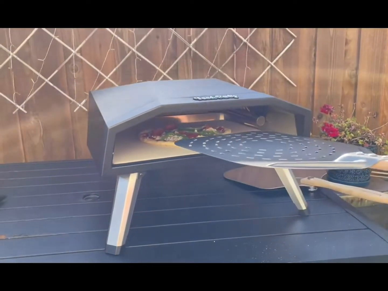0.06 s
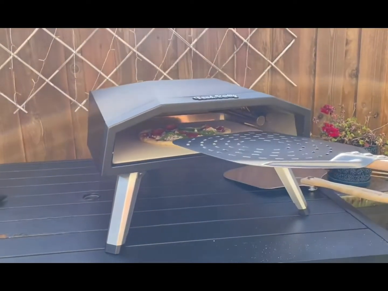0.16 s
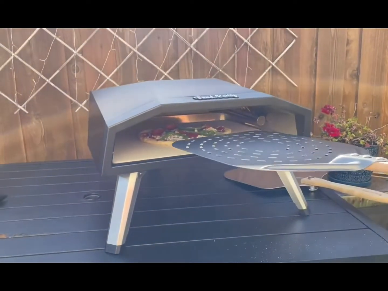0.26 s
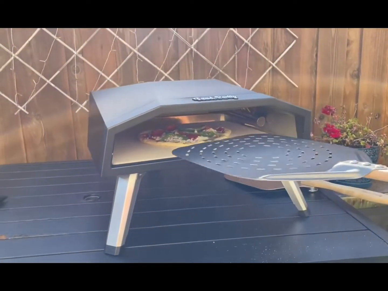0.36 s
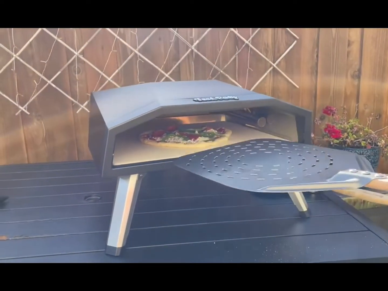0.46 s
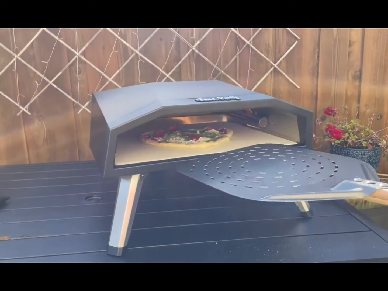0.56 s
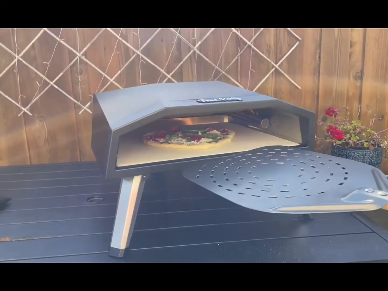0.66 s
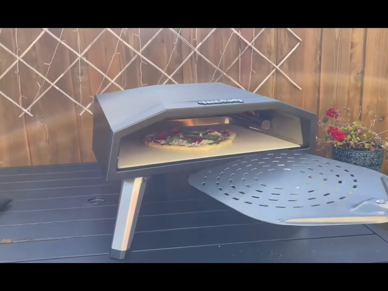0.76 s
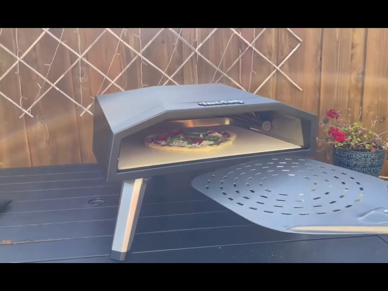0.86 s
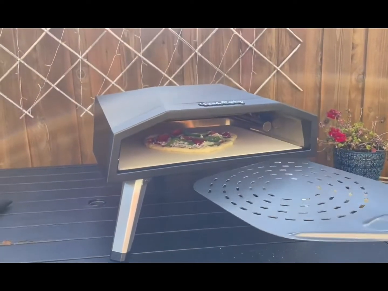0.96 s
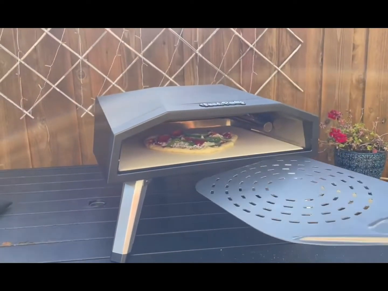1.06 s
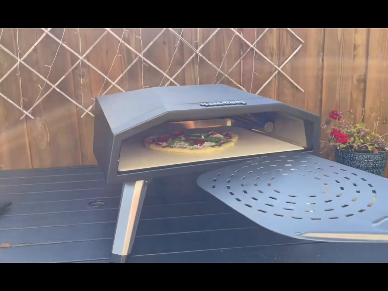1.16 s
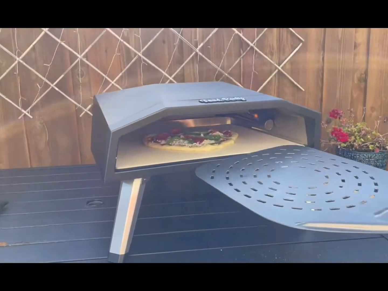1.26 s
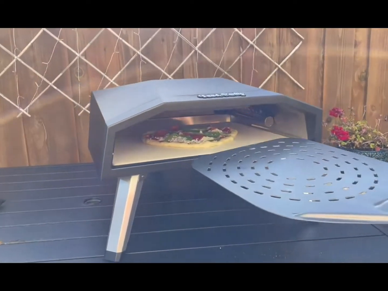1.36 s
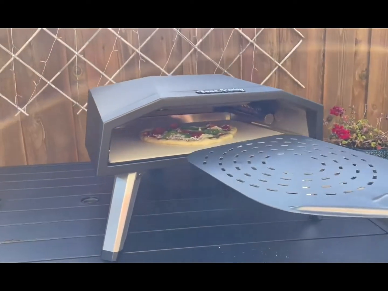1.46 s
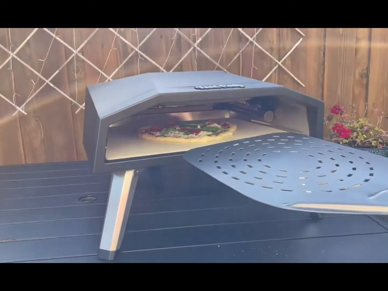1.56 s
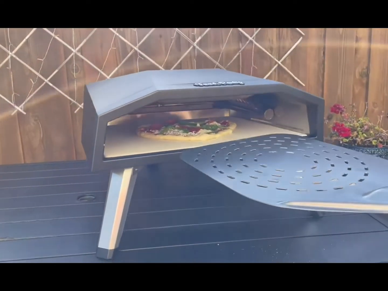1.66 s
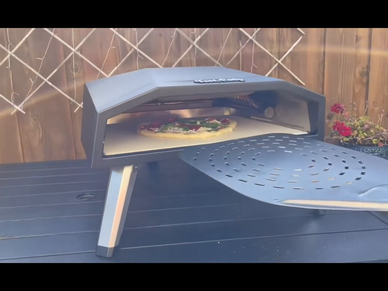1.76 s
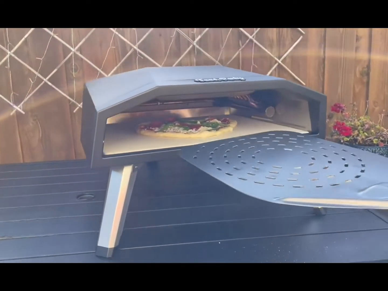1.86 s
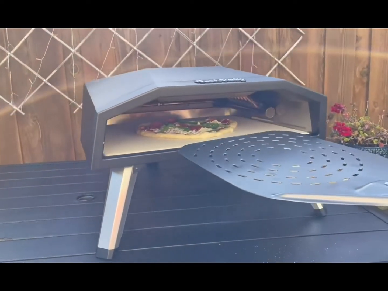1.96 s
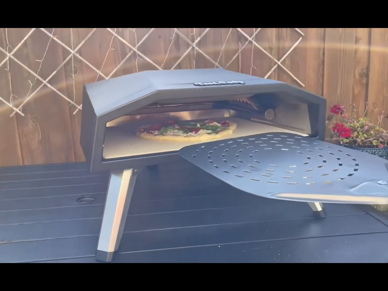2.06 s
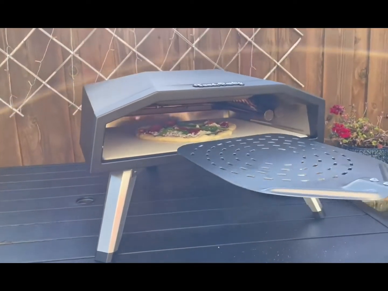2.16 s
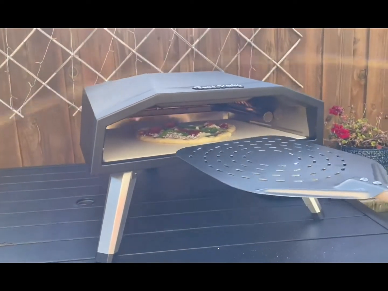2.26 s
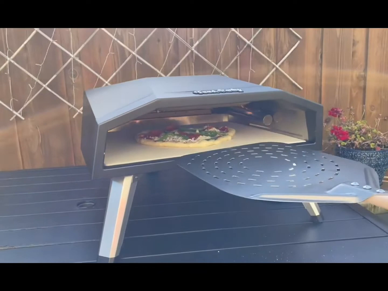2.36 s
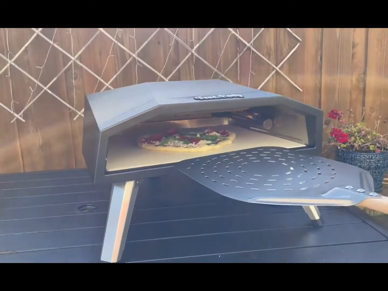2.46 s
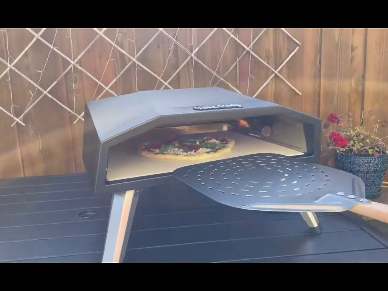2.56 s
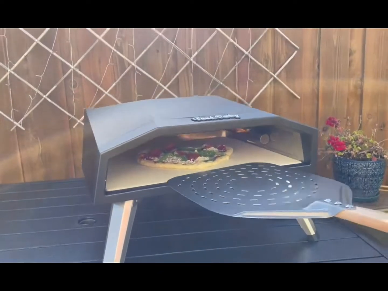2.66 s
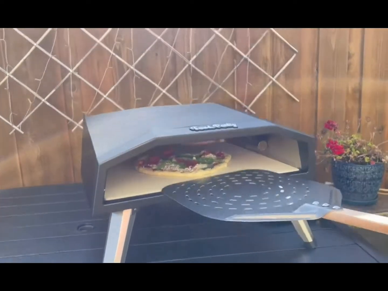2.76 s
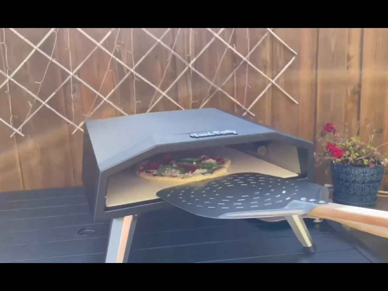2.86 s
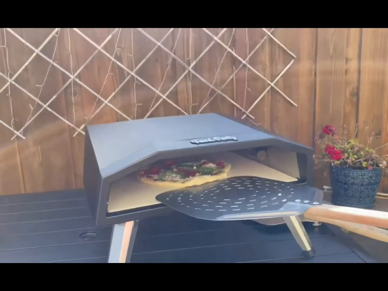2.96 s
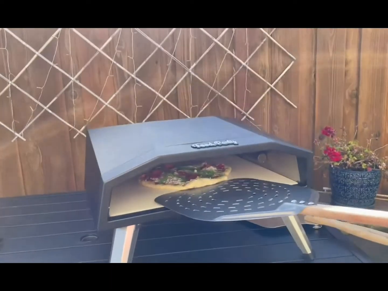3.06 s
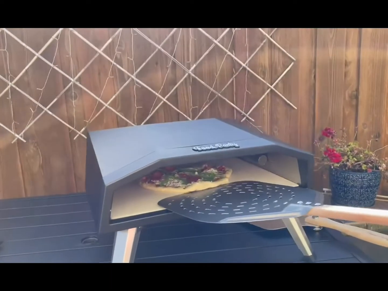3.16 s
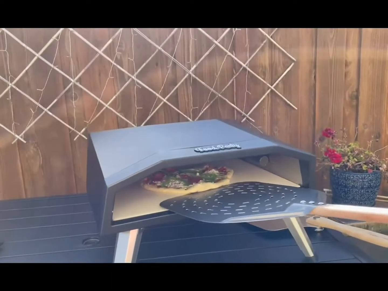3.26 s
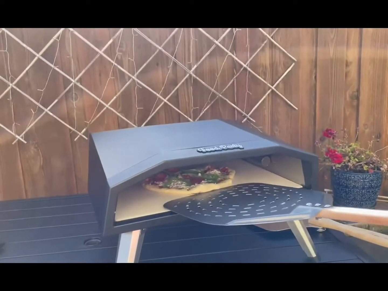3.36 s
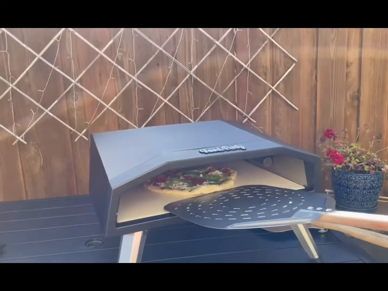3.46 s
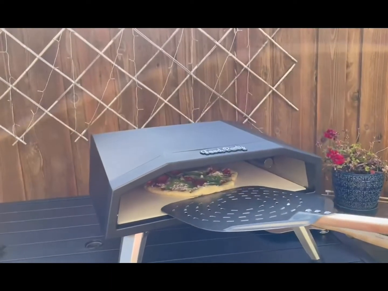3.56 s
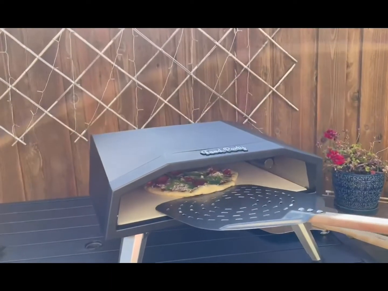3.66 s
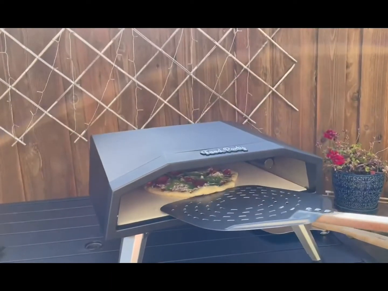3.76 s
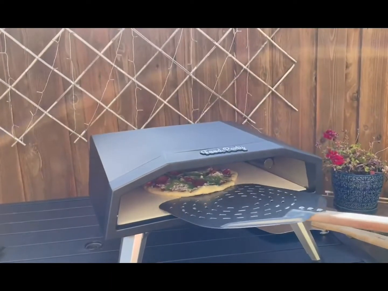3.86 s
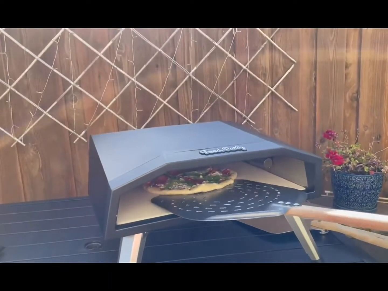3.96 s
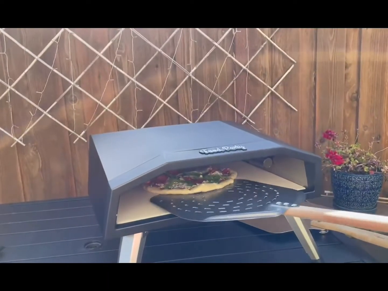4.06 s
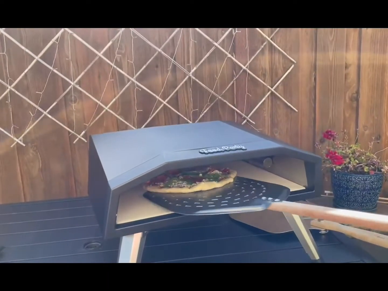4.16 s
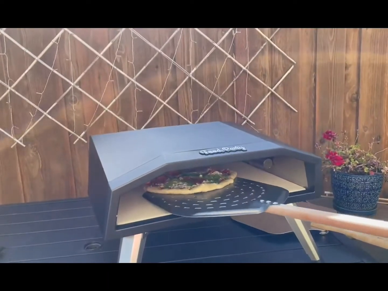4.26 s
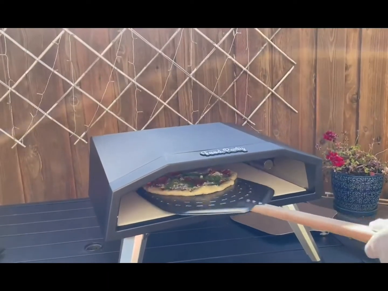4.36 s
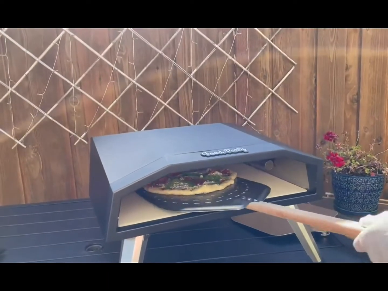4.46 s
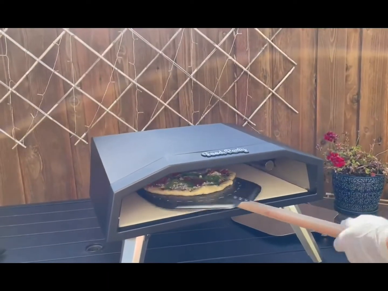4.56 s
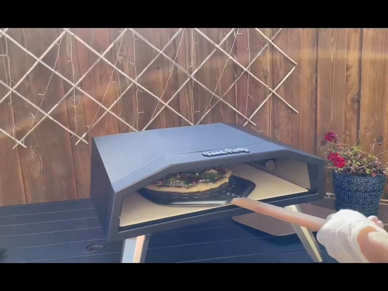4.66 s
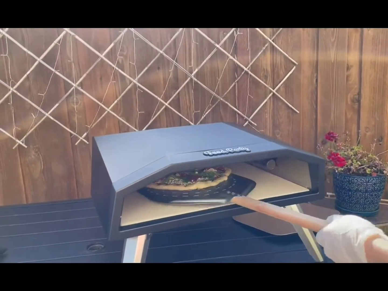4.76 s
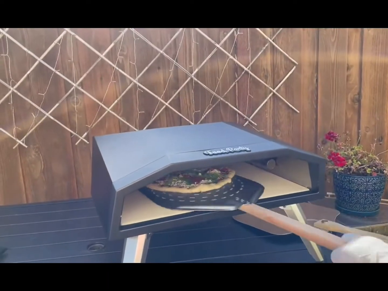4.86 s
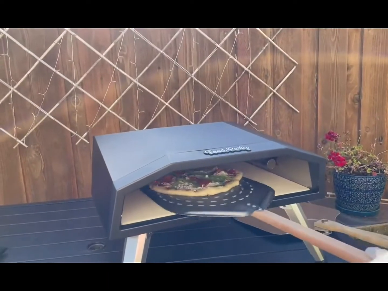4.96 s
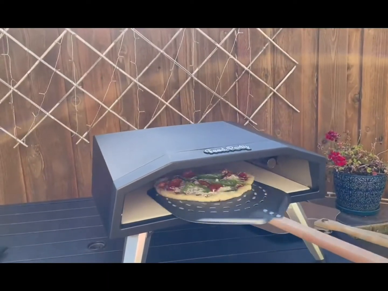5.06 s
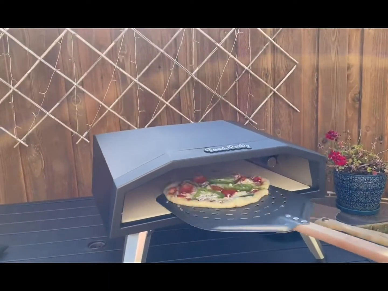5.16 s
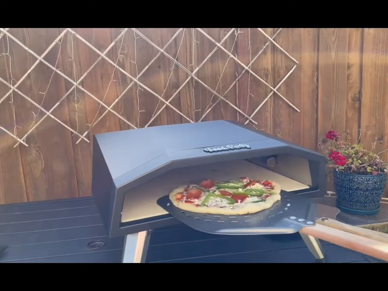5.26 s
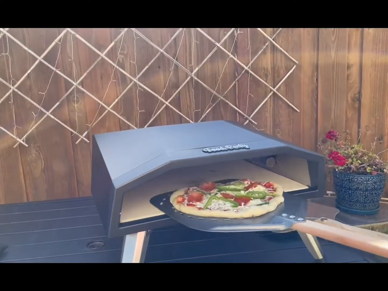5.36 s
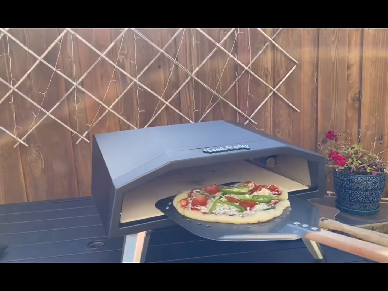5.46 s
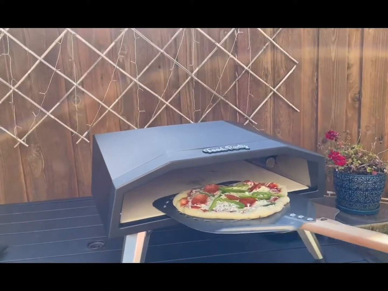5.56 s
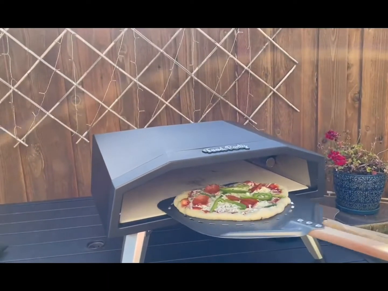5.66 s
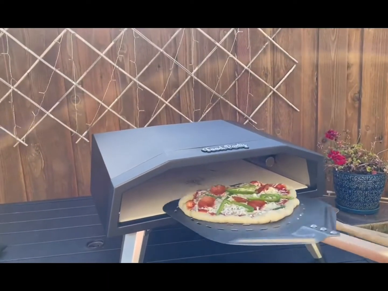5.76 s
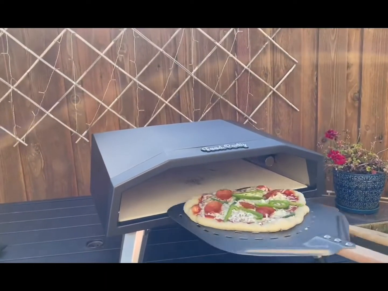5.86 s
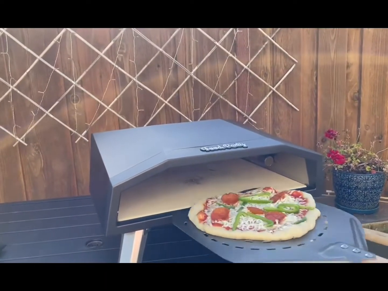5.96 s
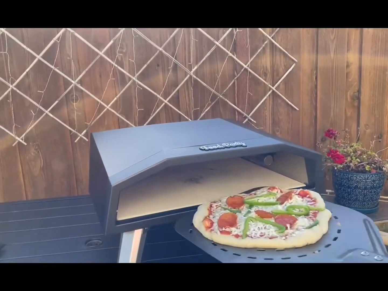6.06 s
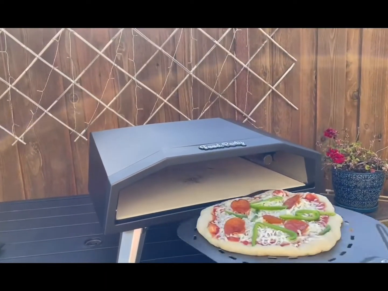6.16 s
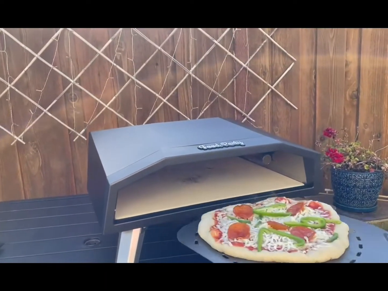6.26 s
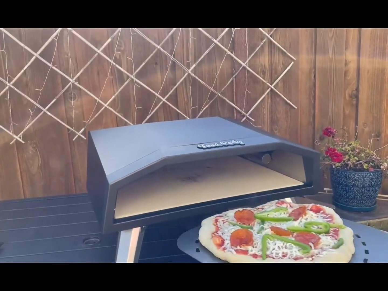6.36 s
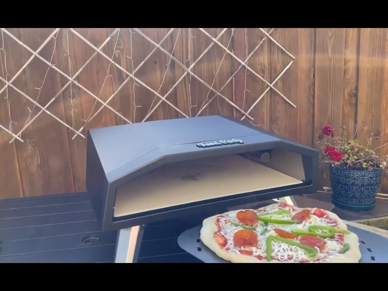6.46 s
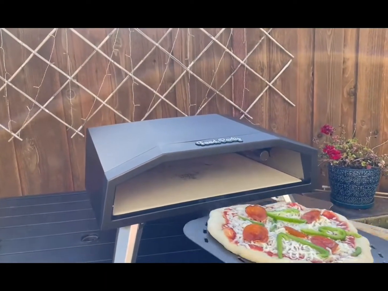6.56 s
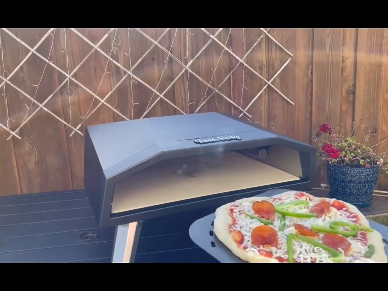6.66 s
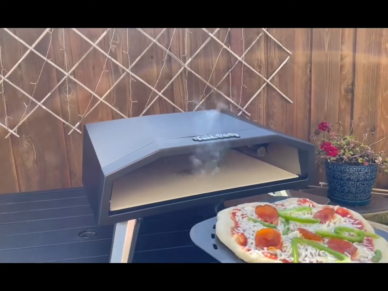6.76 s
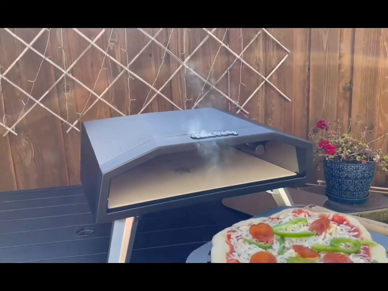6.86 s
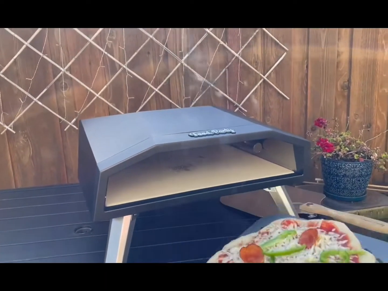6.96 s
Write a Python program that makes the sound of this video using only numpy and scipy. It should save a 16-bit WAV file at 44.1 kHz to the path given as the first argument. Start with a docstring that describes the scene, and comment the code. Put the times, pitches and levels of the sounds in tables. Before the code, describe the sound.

Close outdoor microphone on a patio. Small dry ticks dot quiet air for two seconds, then a gust rumbles and pops against the microphone. A thin metal peel claps onto the oven stone and scrapes gritty and bright in short strokes, strongest before the middle four-second mark. Lower droning, hard cracks and a brief squeak follow as it works under the pizza. It leaves; faint ticks, a rustle and distant whine remain.

```python
"""Small dry ticks come first, in quiet outdoor air; then a gust buffets the microphone with rumble and pops.
A perforated metal peel claps down on the stone of a patio pizza oven and is shoved under the pizza in strokes.
Random slips of grit shake the modes of its blade: it hisses, rasps, drones and cracks where it catches.
The peel is drawn out and carried off with a faint rustle, while a thin far whine and a low hum fade in.
Contacts are noise bursts ringing a plate, wind is filtered noise with slowing pops, the whine is a sine."""
import sys
import numpy as np
from scipy import signal
from scipy.fft import rfft, irfft, next_fast_len
from scipy.io import wavfile
from scipy.ndimage import uniform_filter1d, map_coordinates

SR = 44100
rng = np.random.default_rng(int(sys.argv[2]) if len(sys.argv) > 2 else 0)


def generate_wav(signal):
    """Clip the signal to [-1, 1] and save it as 16-bit WAV at the path in sys.argv[1]."""
    frames = np.transpose(np.atleast_2d(signal))
    scaled = np.clip(frames, -1, 1) * 32767
    pcm = np.round(scaled).astype(np.int16)
    wavfile.write(sys.argv[1], SR, pcm)


N = 310023
TIME = np.arange(N) / SR

# colour of the hiss before the pizza covers the blade: [f/Hz, level/dB]
BARE_HISS = [(2000, -40), (6000, -20), (7400, -6.5), (8500, -3), (10000, -.5), (11500, -1.5), (13200, -1.5),
             (14200, -5), (15000, -12), (15800, -19)]
# colour of the hiss under the pizza: [f/Hz, level/dB]
COVERED_HISS = [(2000, -40), (6000, -22), (7400, -10), (8500, -7), (10000, -3.5), (11500, -1), (13100, 0),
                (14200, -4), (15000, -11), (15800, -18)]
# colour of the metallic edge rasp: [f/Hz, level/dB]
RASP = [(1500, -43), (2600, -16), (3300, -0.5), (4400, -0.5), (5300, 0), (6600, 1.5), (8000, -10),
        (10000, -36), (15000, -9)]
# colour of the hollow blade body: [f/Hz, level/dB]
BODY = [(200, -34), (450, 2.5), (700, 2), (1200, 0), (1900, -1.5), (2600, 0.5), (3300, -8.5), (6000, -64)]
COVER_S, COVERING_S = 3.4, .7   # the pizza covers the blade: from when, over how long
JUDDER_DB, JUDDERS_PER_S = .9, 200   # stick and slip roughen the scrape
# the bare blade keeps one mode singing; its level is against the rasp
SING_HZ, SING_WIDTH_HZ, SING_DB = 3330, 12, -8
SING_FADE_S, SING_FADING_S = 2.8, .6   # that mode is damped as the blade goes in: from when, how long
JOLT_RASP_DB, JOLT_BODY_DB = -14, -17   # how strongly a catch also shakes the rasp and the body
JOLT_SPREAD_S = 0.018   # the edge digs in and lets go over this time


def scrape():
    """Grit under the sliding edge hisses and shakes the blade, which rasps, sings, booms and drones."""
    hiss_gain, rasp_gain, body_gain = friction()
    judder = from_db(JUDDER_DB * drift(JUDDERS_PER_S))

    grains = sliding_plate(hiss_gain * judder, t60=0.12, ring_db=-4.5)
    covered = ramp(COVER_S, COVERING_S)
    hiss = colour(grains * (1 - covered), BARE_HISS) + colour(grains * covered, COVERED_HISS)

    edge = flexed(sliding_plate(1, t60=0.16, ring_db=5))
    blade = evened(pressed_blade(edge, ring_db=-10.5), span_s=0.0084) * judder + snags()
    singing = evened(resonance(white(), SING_HZ, SING_WIDTH_HZ), span_s=.05)
    singing = from_db(SING_DB) * singing * (1 - ramp(SING_FADE_S, SING_FADING_S))

    jolt = uniform_filter1d(bursts(CATCHES), int(JOLT_SPREAD_S * SR))
    rasp_drive = np.hypot(rasp_gain, from_db(JOLT_RASP_DB) * jolt)
    body_drive = np.hypot(body_gain, from_db(JOLT_BODY_DB) * jolt)
    rasp = colour(blade * rasp_drive, RASP) + singing * rasp_gain
    body = colour(blade * body_drive, BODY)
    mixed = from_db(2.0) * hiss + from_db(-1.35) * rasp + from_db(-0.24) * body
    return oven(mixed) + drone(body_gain)


# pushes and pulls of the blade on the stone: [start t/s, speeding up t/s, slowing down t/s,
# hiss level/dB, rasp against hiss level/dB, body against hiss level/dB]
STROKES = [(2.608, 0.01, 0.31, -41, -4, -5.5), (2.697, 0.15, 0.1, -33.5, -10, -34),
           (2.781, 0.073, 0.058, -31, -7.5, -21), (2.873, 0.044, 0.065, -36, -4, -16),
           (2.997, 0.06, 0.055, -35, -8, -16.5), (3.093, 0.085, 0.053, -39.5, -5.5, -15.5),
           (3.285, 0.08, 0.25, -40, -10, -23), (3.418, 0.018, 0.052, -32, -9, -24),
           (3.507, 0.14, 0.27, -31, -8.5, -20), (3.713, 0.077, 0.071, -30.5, -9.5, -18.5),
           (3.824, 0.11, 0.092, -25, -7, -16), (4.077, 0.07, 0.11, -27, -9, -14),
           (4.215, 0.055, 0.046, -45.5, -5, -19), (4.3, 0.048, 0.12, -31, -6.5, -8),
           (4.512, 0.015, 0.14, -40.5, -3.5, -9), (4.563, 0.056, 0.07, -40, -1.5, -17),
           (4.741, 0.15, 0.029, -41, -1.5, -24), (5.05, 0.06, .04, -57, 6.5, -12),
           (5.125, 0.0061, 0.041, -34, -8, -28), (5.158, .01, 0.058, -39.5, -5, -25),
           (5.217, 0.0059, 0.054, -35.5, -7, -13.5), (5.245, 0.062, 0.09, -35.5, -8, -17.5),
           (5.371, 0.061, 0.081, -37.5, -6, -13.5), (5.464, 0.035, 0.2, -49, -1.5, -11),
           (5.645, 0.0046, 0.079, -41, -3.5, -9), (5.669, 0.058, 0.11, -35, -5.5, -17),
           (5.837, 0.061, 0.063, -38, -3, -10), (5.944, 0.037, 0.017, -44.5, -8.5, -15.5)]
HISS_POWER, RASP_POWER, BODY_POWER = 2.05, 1.43, 1.9   # each grows as this power of the sliding speed
ON_STONE_S = (2.616, 6.0)   # the blade lies on the stone from, until
DRAG_HISS_DB, DRAG_RASP_DB, DRAG_BODY_DB = -58.5, -57, -59.5   # it keeps creeping between strokes


def friction():
    """Strength of hiss, rasp and body: each follows the speed of the strokes, over a slow creep."""
    touching = (TIME > ON_STONE_S[0]) & (TIME < ON_STONE_S[1])
    creep = from_db([[DRAG_HISS_DB], [DRAG_RASP_DB], [DRAG_BODY_DB]])
    power = (creep * touching) ** 2
    growth = np.array([[HISS_POWER], [RASP_POWER], [BODY_POWER]])
    for start_s, rise_s, fall_s, db, rasp_db, body_db in STROKES:
        speed = swell(start_s, rise_s, fall_s)
        moving = speed > 0
        strongest = from_db([[db], [db + rasp_db], [db + body_db]])
        power[:, moving] += (strongest * speed[moving] ** growth) ** 2
    return np.sqrt(power)


def swell(start_s, rise_s, fall_s):
    """Speed of one move of the hand: from rest up to 1 and back to rest."""
    rising = ramp(start_s, rise_s)
    falling = 1 - ramp(start_s + rise_s, fall_s)
    return np.sin(np.pi / 2 * np.minimum(rising, falling))


MODE_SPREAD_DB = 6   # a place on the edge wakes some modes far more than others


def sliding_plate(force, t60, ring_db, count=4):
    """The touching point wanders along the edge, and each place wakes other modes of the sheet."""
    shares = np.array([from_db(18 * drift(8)) for _ in range(count)])
    shares /= np.linalg.norm(shares, axis=0)
    out = np.zeros((2, N))
    for share in shares:
        rubbing = grit(per_s=9000, size_db=1.5, judder_db=2.0) * force * share
        out += thin_plate(rubbing, t60, ring_db, MODE_SPREAD_DB)
    return out


def grit(per_s, size_db, judder_db):
    """Grains of stone slip under the edge at random, rougher and softer as the blade judders."""
    sizes = from_db(size_db * np.minimum(rng.exponential(1, N), 4))
    slips = white() * sizes * (rng.random(N) < per_s / SR)
    return rms_one(slips * from_db(judder_db * drift(180)))


def thin_plate(force, t60, ring_db, spread_db=0, count=480):
    """A thin sheet's crowd of weak higher modes, about evenly spaced in Hz; spread_db makes them uneven."""
    t = np.arange(SR // 4) / SR
    lines = np.zeros(len(t) // 2 + 1, complex)
    places_hz = np.linspace(800, 16000, count) + rng.uniform(-40, 40, count)
    strengths = from_db(spread_db * np.minimum(rng.standard_normal(count), 2))
    bins = (places_hz * len(t) / SR).astype(int)
    lines[bins] = strengths * np.exp(2j * np.pi * rng.random(count))
    modes = irfft(lines, len(t)) * np.exp(-np.log(1000) * t / t60)
    response = from_db(ring_db) * modes / np.linalg.norm(modes)
    response[0] += 1   # the force itself is heard directly
    return signal.oaconvolve(force, response[None] / np.linalg.norm(response), axes=1)[:, :N]


# modes of the blade pressed on the stone: [f/Hz, width f/Hz, level/dB]
PRESSED = [(1110, 74, -1.5), (1215, 82, 3), (1580, 61, 6), (2215, 77, 4.5), (2670, 110, -2.5),
           (2780, 80, 9), (3285, 120, 9.5), (3870, 120, 5.5), (4460, 210, 11), (4940, 130, 6.5),
           (5140, 79, -11), (6520, 160, 0), (7140, 200, 1)]
BEND_SHARE, BENDS_PER_S = .022, 8   # the modes shift as the blade flexes
ROAM_DB, ROAMS_PER_S = 9, 9   # how much and how often the drive of a mode changes


def pressed_blade(force, ring_db):
    """Force is heard directly and through damped bending modes, which shift as the contact point moves."""
    ringing = 0
    for hz, width, db in PRESSED:
        moving_hz = hz * (1 + BEND_SHARE * drift(BENDS_PER_S))
        drive = from_db(db + ROAM_DB * np.tanh(drift(ROAMS_PER_S)))
        ringing = ringing + resonance(force, moving_hz, width) * drive
    return force + from_db(ring_db) * ringing


FLEX_SHARE, FLEXES_PER_S = .012, 6   # the fine modes shift together as the blade flexes


def flexed(x):
    """Bending the sheet raises and lowers all its modes a little: the sound is read at a varying speed."""
    place = np.cumsum(1 + FLEX_SHARE * drift(FLEXES_PER_S))
    return np.array([map_coordinates(ch, [place], order=3, mode="mirror") for ch in x])


SNAGS_PER_S, SNAG_DB = 90, -9.5   # coarse grains snag the edge at random; level against the smooth rasp


def snags():
    """Coarse grains catch the edge, each a tiny crack with a short shudder."""
    cracks = rng.choice([-1, 1], (2, N)) * rng.uniform(0.14, 1, N) * (rng.random(N) < SNAGS_PER_S / SR)
    return from_db(SNAG_DB) * rms_one(thin_plate(cracks, t60=.025, ring_db=7))


# the blade's lowest modes:
# [f/Hz, width f/Hz, level/dB at the hardest push, power by which it grows with the push]
LOW_MODES = [(179.5, 47, -59.5, 0.32), (235, 12, -44, 0.71), (248, 7.2, -52.5, 2.3), (349, 13, -54.5, 0.7),
             (488, 16, -51, 1.15), (639, 22, -43.5, 1.27), (670, 82, -60, 0.74)]
LOADED_S, LOADING_S = 4.15, .15   # the pizza's weight comes onto the blade: from when, over how long
DRONE_LAG_S, DRONE_BEND_SHARE = .032, .02   # the drone trails the push, and its pitch wanders


def drone(push):
    """Once it carries the pizza, the blade's low modes follow the push with a lag, each at its own power."""
    keep = np.exp(-1 / (DRONE_LAG_S * SR))
    stored = signal.lfilter([1 - keep], [1, -keep], push + 1e-18)
    effort = stored / stored.max()
    shaking = white()
    bend = 1 + DRONE_BEND_SHARE * drift(4)
    modes = 0
    for hz, width, db, power in LOW_MODES:
        mode = evened(resonance(shaking, hz * bend, width), span_s=0.076)
        modes = modes + from_db(db) * effort ** power * mode
    return ramp(LOADED_S, LOADING_S) * modes


# the echo off the oven's roof, as the blade moves: [t/s, delay t/s]
ROOF_PATH = [(2.6, .00183), (3.05, .00188), (3.55, .00197), (3.85, .00187), (3.95, .002), (4.1, .0017),
             (4.3, .00185)]
# weak echoes off the oven's walls: [delay t/s]
WALL_DELAYS = [.00068, .00082, .00098, .00118, .0023, .003, .0037]
HOOD_SHARE, HOOD_FLICKER_DB = .22, 4   # the roof echo comes and goes as the blade tilts
SHADE_S, SHADING_S = 4.18, .14   # the pizza shades the roof echo: from when, over how long
WALL_SHARE, WALL_CHANGES_PER_S = .14, 7   # wall echoes swing in strength and sign as the blade moves


def oven(x):
    """The roof echo varies in delay until the pizza shades it; wall echoes vary in strength and sign."""
    flicker = from_db(HOOD_FLICKER_DB * np.tanh(drift(7.98)))
    share = HOOD_SHARE * flicker * (1 - ramp(SHADE_S, SHADING_S))
    sent = (TIME - np.interp(TIME, *np.transpose(ROOF_PATH))) * SR
    out = x + share * np.array([map_coordinates(ch, [sent], order=3) for ch in x])
    power = 1 + share ** 2
    for delay_s in WALL_DELAYS:
        share = WALL_SHARE * drift(WALL_CHANGES_PER_S)
        out = out + share * np.roll(x, round(delay_s * SR), axis=1)
        power = power + share ** 2
    return out / np.sqrt(power)   # echoes change the colour more than the level


# the blade lands on the stone: [t/s, level/dB, contact t60/s (time to fade by 60 dB)]
LANDINGS = [(2.4218, -17, 0.064), (2.4477, -14.5, 0.047), (2.453, -34, 0.019), (2.615, -21, 0.24)]
# modes of the blade ringing freely: [f/Hz, level/dB, t60/s]
FREE = [(620, 0, .35), (764, 1, .4), (1071, -5, 1.0), (1400, -10, 1.0), (1567, -13, .48), (1723, -2, .45),
        (2207, -8, .56), (2390, -2, .45), (2550, -3, .4), (3058, -2, .25), (3321, -5, 1.3), (3494, -6, .25),
        (3978, -4, .2), (5109, -11, .3), (6492, -6, .2)]
# colour of the weak modes ringing on: [f/Hz, level/dB]
BLOOM = [(300, 2), (700, -3), (1500, 3), (2500, 3), (3500, 2.5), (5500, -3.5), (9000, -2), (16000, -28)]
# colour of the clap: [f/Hz, level/dB]
KNOCK = [(150, -5), (600, -2), (1500, -29), (3400, 2.5), (6000, -6.5), (9000, 5.5), (13000, -3.5),
         (16000, -15)]


def landings():
    """The blade claps on the stone; a few clear modes and a crowd of weak ones ring on."""
    force = white() * bursts(LANDINGS)
    ring = np.zeros((2, N))
    t = np.arange(SR) / SR
    for s, landing_db, _ in LANDINGS:
        at = round(s * SR)
        for hz, db, t60 in FREE:
            phase = 2 * np.pi * (hz * t + rng.random((2, 1)))
            fade = np.exp(-np.log(1000) * t / t60)
            ring[:, at:at + SR] += from_db(landing_db + db) * fade * np.sin(phase)
    bloom = colour(thin_plate(force, t60=0.21, ring_db=30, spread_db=3), BLOOM)
    clap = colour(thin_plate(force, t60=0.018, ring_db=-4.0), KNOCK)
    return from_db(-6.5) * clap + from_db(-13.5) * bloom + from_db(-34) * ring


# the edge catches on the stone: [t/s, level/dB, contact t60/s]
CATCHES = [(3.4345, -35, 0.035), (3.454, -30.5, 0.47), (4.097, -30, 0.023), (4.319, -24, 0.029),
           (4.491, -29, 0.023), (4.517, -27.5, 0.048), (4.881, -21.5, 0.047), (5.016, -34.5, 0.065),
           (5.137, -47, 0.037), (5.2268, -22.5, 0.028), (5.4641, -13, 0.035), (5.65, -28, 0.033),
           (5.7507, -10.5, 0.019), (5.8436, -26, 0.069), (5.8747, -14, 0.025)]
# colour of a catch: [f/Hz, level/dB]
CATCH = [(60, -9), (280, 9.5), (1500, -16.5), (3800, 6.5), (5600, 7.5), (8000, 15), (10500, 10.5),
         (13000, 18.5), (16000, -46)]
CRACK_T60_S = .011   # fade of the force behind the first crack


def catches():
    """The edge snags: a sharp crack, with a shudder of the blade."""
    crack_fades = bursts([(s, db, CRACK_T60_S) for s, db, _ in CATCHES])
    crack = evened(white(), span_s=0.0016) * crack_fades
    crack = thin_plate(crack, t60=.035, ring_db=-4)
    shudder = thin_plate(white() * bursts(CATCHES), t60=0.027, ring_db=-14.0)
    return colour(from_db(-2) * crack + from_db(-20.5) * shudder, CATCH)


# modes that glide together as the edge slides right under the pizza:
# [starting f/Hz, final f/Hz, width f/Hz, level/dB]
CHAFE_MODES = [(4300, 4000, 120, -48.5), (3260, 3840, 410, -42.5)]
CHAFE_START_S, CHAFE_RISE_S, CHAFE_FALL_S = 4.76, .145, .03
SQUEAK_START_S, SQUEAK_RISE_S, SQUEAK_FALL_S = 4.89, .022, .012
SQUEAK_HZ, SQUEAK_RISE_HZ_PER_S, SQUEAK_DB = 4150, 2700, -42   # pitch at its start, slight rise, level


def chafe():
    """Uneven slips drive two gliding modes hoarsely; a short, rising, jittery squeak comes near the end."""
    slips = white() * from_db(5.3 * drift(140))
    depth = ramp(CHAFE_START_S, CHAFE_RISE_S)
    hoarse = 0
    for first, last, width, db in CHAFE_MODES:
        gliding_hz = first + (last - first) * depth
        hoarse = hoarse + from_db(db) * rms_one(resonance(slips, gliding_hz, width))
    hz = SQUEAK_HZ + SQUEAK_RISE_HZ_PER_S * (TIME - SQUEAK_START_S) + 35 * drift(280)
    tone = np.sin(2 * np.pi * np.cumsum(hz) / SR)
    squeak = from_db(SQUEAK_DB + 2.9 * drift(200)) * tone * [[1], [0]]
    hoarse = swell(CHAFE_START_S, CHAFE_RISE_S, CHAFE_FALL_S) ** 2 * hoarse
    return hoarse + swell(SQUEAK_START_S, SQUEAK_RISE_S, SQUEAK_FALL_S) * squeak


# low modes of the bump: [f/Hz, level/dB, t60/s]
BUMP_MODES = [(58, -31.5, 0.19), (176, -36.5, 0.3)]
BUMP_S, BUMP_RISE_S = 4.917, 0.0061   # the peel reaches the back of its stroke


def bump():
    """A soft push sets two low modes swinging briefly."""
    t = np.maximum(TIME - BUMP_S, 0)
    modes = sum(from_db(db - 60 * t / t60) * np.sin(2 * np.pi * hz * t) for hz, db, t60 in BUMP_MODES)
    return ramp(BUMP_S, BUMP_RISE_S) * modes


# small dry ticks: [t/s, level/dB, lower ring against the snap level/dB]
TICKS = [(0.181, -39.5, 9.5), (.212, -36.5, 7.5), (0.2603, -35.5, 2), (0.327, -37.5, 13.5),
         (0.511, -36, 5.5), (0.599, -36, 12), (.72, -43.5, 10.5), (0.821, -31, -2), (0.8998, -37.5, 4),
         (1.0177, -31, 7), (1.444, -30, 9), (1.5197, -29.5, 2.5), (1.6418, -31.5, 4), (1.725, -31, 3.5),
         (1.7948, -37, 6), (2.259, -39.5, 16.5), (2.2934, -31.5, 4), (2.374, -38.5, 9), (2.3837, -39, 15),
         (2.572, -30, -1), (3.254, -29, -13), (6.0408, -43.5, 10), (6.3209, -37, 10.5), (6.8466, -51, 24)]
# colour of the bright snap: [f/Hz, level/dB]
SNAP = [(1500, -82), (7000, -19), (10500, 2.5), (13200, 7), (16000, -7)]
# colour of the lower ring: [f/Hz, level/dB]
TICK_RING = [(800, 0.5), (2000, -10.5), (3000, 1), (4500, 0), (6500, 0.5), (9000, 7), (16000, -65)]


def ticks():
    """Each tick is a tiny bright snap with a lower ring, a crumble and a faint tail."""
    snap = clicks([(s + 0.00017, db) for s, db, _ in TICKS]) * [[1], [0]]
    ring = clicks([(s + 0.00037, db + ring_db) for s, db, ring_db in TICKS]) * [[1], [0]]
    crumble = white() * bursts([(s, db, .008) for s, db, _ in TICKS])
    tail = white() * bursts([(s, db + ring_db, .04) for s, db, ring_db in TICKS])
    bright = from_db(-7.5) * snap + from_db(-2) * crumble + from_db(-23.5) * tail
    lower = from_db(-6) * ring + from_db(-19.5) * tail
    return colour(bright, SNAP) + colour(lower, TICK_RING)


CRACKLE_DB = -45   # strength of the random pulses before they are coloured


def crackle(per_s):
    """Faint ticks scattered at random while the peel is carried, until the blade lands."""
    carried = TIME < LANDINGS[0][0]
    pulses = white() * (rng.random(N) < per_s / SR) * from_db(CRACKLE_DB) * carried
    coloured = from_db(10) * colour(pulses, SNAP) + from_db(6.0) * colour(pulses, TICK_RING)
    return thin_plate(coloured, t60=.02, ring_db=0)


# light pitched clinks of the peel: [t/s, level/dB, f/Hz]
CLINKS = [(2.282, -45, 2720), (4.762, -36.5, 2940), (5.019, -37.5, 3250), (6.785, -48.5, 3200),
          (6.885, -45, 3130)]
# modes of a clink: [multiple of its pitch, level/dB, t60/s]
CLINK_MODES = [(.8, -9.5, .03), (1, -4, .05), (1.15, -4, .02), (2.02, -17, 0.048)]


def clinks():
    """A light touch sets a few short modes ringing."""
    out = np.zeros(N + SR)
    t = np.arange(SR // 8) / SR
    for s, db, hz in CLINKS:
        at = round(s * SR)
        for multiple, mode_db, t60 in CLINK_MODES:
            fade = from_db(db + mode_db) * np.exp(-np.log(1000) * t / t60)
            out[at:at + len(t)] += fade * np.sin(2 * np.pi * hz * multiple * t)
    return out[:N] * [[1], [0]]


# colour of the rustle: [f/Hz, level/dB]
RUSTLE_TONE = [(1200, -13), (2700, 2), (4000, -1), (6500, 0), (10000, -3), (16000, -15)]
RUSTLE_START_S, RUSTLE_RISE_S, RUSTLE_FALL_S, RUSTLE_DB = 6.7, .13, .17, -62.5


def rustle():
    """A faint, uneven rustle as the peel is carried off: noise of fluctuating strength."""
    rubbing = colour(white() * from_db(4.1 * drift(90)), RUSTLE_TONE)
    return from_db(RUSTLE_DB) * swell(RUSTLE_START_S, RUSTLE_RISE_S, RUSTLE_FALL_S) * rubbing


# strength of the wind at the microphone: [t/s, rumble level/dB]
WIND = [(0, -67), (.3, -53), (.55, -56.5), (.72, -50.5), (1.0, -57.5), (1.62, -58.5), (1.85, -40),
        (1.95, -52), (2.17, -36.5), (2.24, -36.5), (2.29, -25.5), (2.33, -41.5), (2.46, -35.5),
        (2.52, -41.5), (2.8, -34), (3.04, -38), (3.12, -32), (3.3, -40.5), (3.52, -38), (3.72, -53.5),
        (3.88, -59), (4.5, -59.5), (5.6, -55), (6.8, -52), (7.03, -50)]
# colour of the rumble: [f/Hz, level/dB]
RUMBLE = [(15, -31), (30, -24.5), (50, 1), (75, 0), (130, -7.5), (220, -13.5), (500, -61.5)]
# large eddies that hit the microphone: [t/s, level/dB, starting f/Hz, to which eddy() adds 25 Hz]
EDDIES = [(0.663, -25, 152), (1.467, -31, 100), (1.838, -30.5, 282), (1.914, -36.5, 330), (2.075, -27, 326),
          (2.178, -32, 333), (2.207, -29.5, 485), (2.225, -28, 467), (2.253, -18.5, 740), (2.274, -24, 390),
          (2.301, -28, 506), (2.351, -28.5, 355), (2.4, -28.5, 580), (2.445, -24, 503), (2.604, -31, 705),
          (2.661, -19, 750), (2.687, -24, 750), (2.752, -27, 263), (2.796, -24.5, 760), (2.843, -26, 730),
          (2.867, -24, 790), (2.947, -29, 560), (2.986, -27, 600), (3.05, -26.5, 630), (3.096, -19, 1256),
          (3.122, -28, 219), (3.137, -36, 570), (3.182, -29, 303), (3.216, -26.5, 645), (3.237, -27, 403),
          (3.268, -34, 335), (3.341, -24.5, 490), (3.37, -31, 484), (3.409, -34, 405), (3.458, -29, 547),
          (3.507, -30.5, 505), (3.597, -37, 447), (3.624, -34, 260)]
LUMP_DB, LUMPS_PER_S = 2.3, 16   # the wind comes in lumps
GUST_DB = -32   # rumble of the full gust
FLUTTER_DB, FLUTTER_POWER = -45.5, 1.2   # small eddies at full gust; they grow faster than the rumble


def wind():
    """Lumpy rumble, a flutter of small eddies and pops of large ones; low pitches match best at both ports."""
    gust = levels(WIND)[0] * from_db(LUMP_DB * drift(LUMPS_PER_S))
    rumble = gust * evened(colour(white(), RUMBLE), span_s=0.062)
    flutter = 0
    for hz in np.geomspace(300, 750, 3):
        arrivals = white() * (rng.random(N) < 80 / SR)   # about 80 a second
        flutter = flutter + signal.oaconvolve(arrivals, eddy(hz, t60=0.016)[None], axes=1)[:, :N]
    flutter_gain = from_db(FLUTTER_DB) * (gust / from_db(GUST_DB)) ** FLUTTER_POWER
    flutter = flutter_gain * evened(flutter, span_s=0.067)
    pops = np.zeros(N + SR)
    for s, db, hz in EDDIES:
        at, pop = round(s * SR), eddy(hz)
        pops[at:at + len(pop)] += from_db(db) * pop
    return ports(rumble + flutter + pops[:N] * [[1], [0]], [(60, 0.95), (600, 0.51)])


EDDY_SPREAD, EDDY_RAGGED = .4, .3   # spread of slowing down (octaves), unevenness of the swings (share)


def eddy(hz, cycles=1.758, t60=0.11, size=5000):
    """Pressure of one eddy: a pop that slows, in a few uneven swings, into a low thud."""
    t = np.arange(size) / SR
    cycles = cycles * 2 ** (EDDY_SPREAD * rng.standard_normal())
    turns = cycles * np.log1p(hz * t / cycles) + 25 * t
    sway, surge = (EDDY_RAGGED * map_coordinates(chance, [2 * turns], order=3, mode="wrap")
                   for chance in rng.standard_normal((2, 64)))
    swing = np.sin(2 * np.pi * turns + 2 * sway) * (1 + surge)
    return swing * np.minimum(0.9 * turns, 1) * np.exp(-np.log(1000) * t / t60)


# colour of the outdoor air: [f/Hz, level/dB]
AIR = [(25, -3), (60, -2), (250, 0.5), (500, -3.5), (1000, -7), (2000, -18), (3400, -20), (5500, -21.5),
       (7600, -23), (7950, -7.5), (8300, -22), (10500, -17), (13200, -18), (16000, -24)]
# how alike the air is at the two ports: [f/Hz, likeness from 0 to 1]
AIR_LIKENESS = [(60, 0.85), (300, 0.76), (700, 0.18), (1700, 0.017), (2500, 0.31), (4000, 0.64),
                (6000, 0.25), (8500, 1), (11000, 1), (13300, 0.99)]
WHINE_START_S, WHINE_RISE_S = 6.02, 0.59   # the far whine and its hum fade in together
WHINE_HZ, WHINE_DB, HUM_HZ, HUM_DB = 756, -57, 272, -62


def garden():
    """Steady outdoor air as coloured noise; a thin far whine and a low hum as slightly wavering sines."""
    air = from_db(-52.5) * colour(white(), AIR)
    whine = 0
    for hz, db in (WHINE_HZ, WHINE_DB), (HUM_HZ, HUM_DB):
        phase = 2 * np.pi * np.cumsum(hz + 1.83 * drift(9.1)) / SR
        whine = whine + np.sqrt(2) * np.sin(phase) * from_db(db + .5 * drift(22))
    return ports(air, AIR_LIKENESS) + ramp(WHINE_START_S, WHINE_RISE_S) * whine


# the two microphone ports: [f/Hz, phase by which right leads/rad]
PORT_PHASE = [(100, 0), (400, -.1), (1250, -1), (1850, .7), (2200, 0), (3900, -.3), (5250, -1.1),
              (5750, 1.9), (6600, .7), (7450, 2.85), (8600, 3.14), (9500, 3.3), (11000, 4.6), (13000, 6.25),
              (16000, 6.28)]


def ports(x, likeness):
    """Direct and scattered sound reach two ports whose phase differs with pitch."""
    size = next_fast_len(N + 4096)
    hz = np.fft.rfftfreq(size, 1 / SR)
    direct, scattered = rfft(x, size)
    alike = np.clip(at_hz(likeness, hz), 0, 1)
    shared = np.sqrt((1 + alike) / 2) * direct
    opposed = np.sqrt((1 - alike) / 2) * scattered * [[1], [-1]]
    turn = np.exp(.5j * at_hz(PORT_PHASE, hz) * [[-1], [1]])
    return irfft((shared + opposed) * turn, size)[:, :N]


def resonance(force, hz, width):
    """One damped mode with gain 1 at its centre, which may move."""
    r = np.exp(-np.pi * width / SR)
    turning = np.exp(2j * np.pi * np.cumsum(hz * np.ones(N)) / SR)
    return 2 * np.real(turning * signal.lfilter([1 - r], [1, -r], force * turning.conj() + 1e-18))


def bursts(rows, size=12000):
    """Envelope of sudden contacts [t/s, level/dB, t60/s] that die away."""
    out, t = np.zeros(N + size), np.arange(size) / SR
    for s, db, t60 in rows:
        at = round(s * SR)
        out[at:at + size] += from_db(db) * np.exp(-np.log(1000) * t / t60)
    return out[:N]


def clicks(rows):
    """Single pulses from rows of [t/s, level/dB]."""
    out = np.zeros(N)
    for s, db in rows:
        out[round(s * SR)] += from_db(db)
    return out


def white():
    """Two unrelated noises: the direct sound and its scattered part."""
    return rng.standard_normal((2, N))


def colour(x, spectrum, size=8192):
    """Filter that never sounds early, with the given spectrum; keeps the power of white noise."""
    cepstrum = irfft(np.log(from_db(at_hz(spectrum, np.fft.rfftfreq(size, 1 / SR)))))
    cepstrum[1:size // 2] *= 2   # fold the later half onto the earlier: minimum phase
    cepstrum[size // 2 + 1:] = 0
    response = irfft(np.exp(rfft(cepstrum)))
    return signal.oaconvolve(x, response[None] / np.linalg.norm(response), axes=1)[:, :N]


def drift(rate):
    """Random wandering of rms 1, joining about rate new points a second by straight lines."""
    knots = rng.standard_normal(8192)
    return rms_one(map_coordinates(knots, [TIME * rate], order=1, mode="wrap"))


def ramp(start_s, rise_s):
    """Rises evenly from 0 to 1 and stays there."""
    return np.clip((TIME - start_s) / rise_s, 0, 1)


def evened(x, span_s):
    """Hold the short-term rms at 1."""
    power = uniform_filter1d(np.mean(x ** 2, axis=0), int(span_s * SR))
    return x / np.sqrt(np.maximum(power, 1e-12))


def rms_one(x):
    """Scale to unit rms."""
    return x / np.sqrt(np.mean(x ** 2) + 1e-20)


def levels(rows):
    """One gain curve per dB column."""
    s, *columns = np.transpose(rows)
    return [from_db(np.interp(TIME, s, c)) for c in columns]


def at_hz(points, hz):
    """Read a table on a log-frequency axis."""
    f, value = np.transpose(points)
    return np.interp(np.log(hz + 1), np.log(f), value)


def from_db(db):
    """Decibels to gain."""
    return 10 ** (np.asarray(db) / 20)


# how alike the peel's sound is at the two ports: [f/Hz, likeness from 0 to 1]
NEAR_LIKENESS = [(100, 1), (400, 1), (1500, 0.35), (2200, 0.93), (3800, 0.72), (5300, .5), (6800, 0.16),
                 (7600, 0.83), (8600, 1), (10300, 0.55), (12000, 0.75), (13300, 1)]


def scene():
    """The peel in front of the microphone, in wind and open air."""
    on_stone = scrape() + landings() + catches() + chafe() + bump() * [[1], [0]]
    handled = ticks() + crackle(per_s=36) + clinks() + rustle()
    peel = ports(on_stone + handled, NEAR_LIKENESS)
    # the middle range is a little stronger on the left
    middle = signal.sosfilt(signal.butter(1, [550, 2200], "band", fs=SR, output="sos"), peel)
    return peel + 0.14 * middle * [[1], [-1]] + wind() + garden()


CUTOFF_HZ = 15800


def record(dry):
    """A steep low-pass filter cuts the top."""
    return signal.sosfilt(signal.ellip(12, .1, 80, CUTOFF_HZ, fs=SR, output="sos"), dry)


dry = scene()
out = record(dry)
generate_wav(out)
```